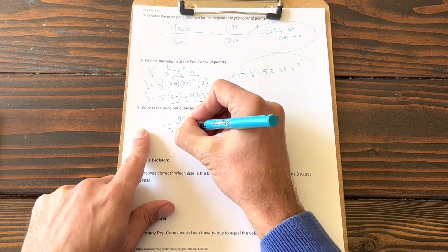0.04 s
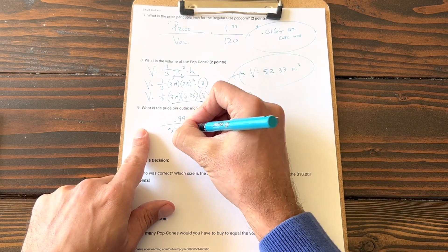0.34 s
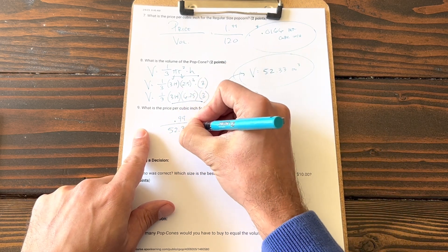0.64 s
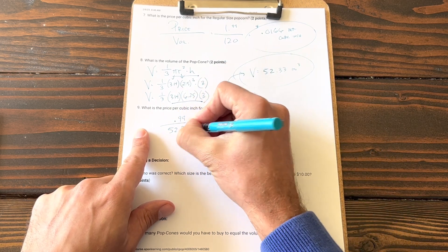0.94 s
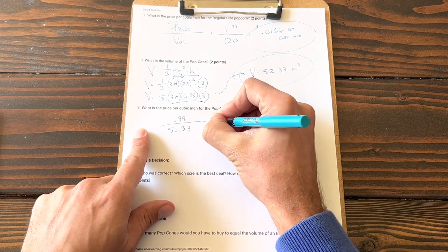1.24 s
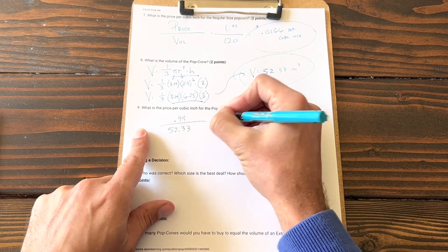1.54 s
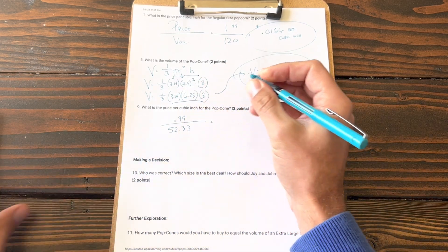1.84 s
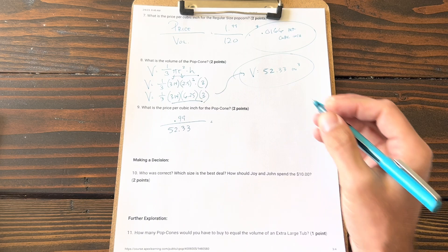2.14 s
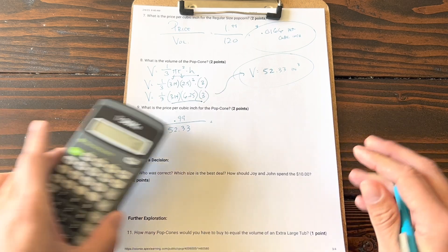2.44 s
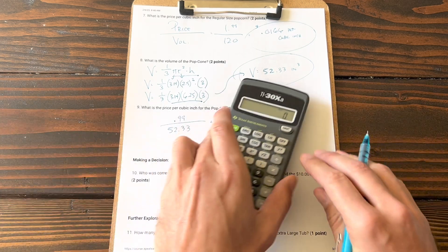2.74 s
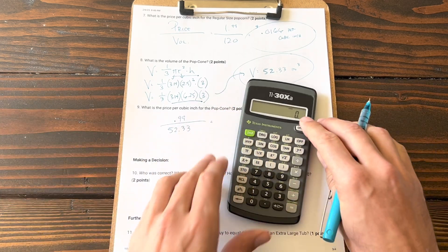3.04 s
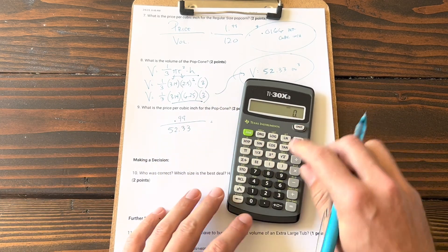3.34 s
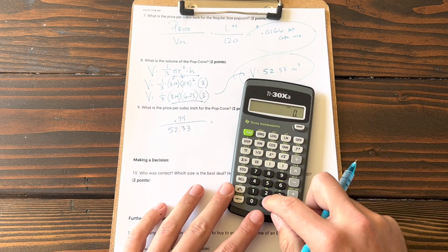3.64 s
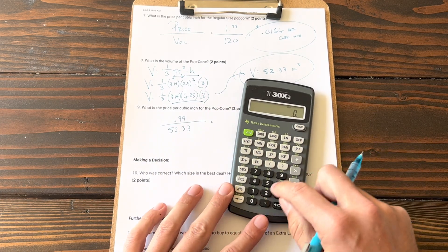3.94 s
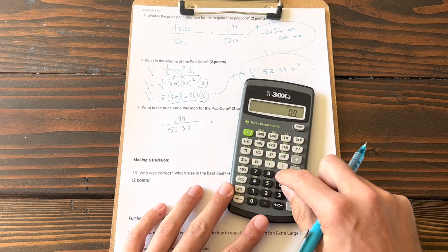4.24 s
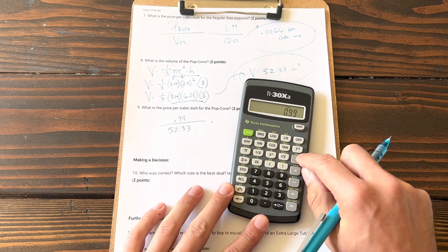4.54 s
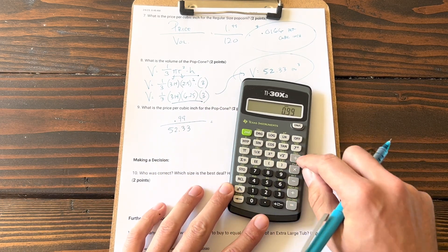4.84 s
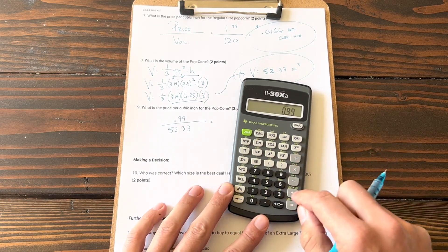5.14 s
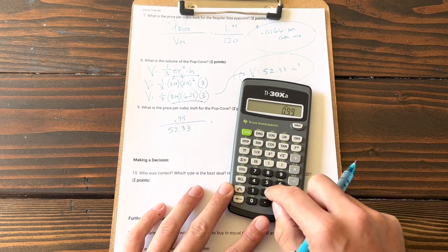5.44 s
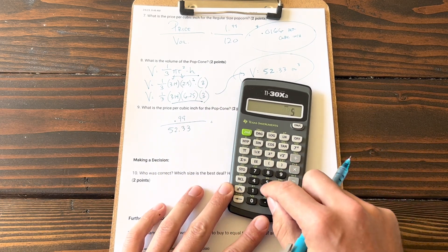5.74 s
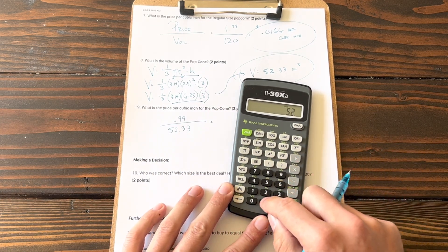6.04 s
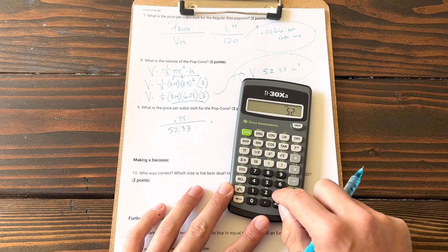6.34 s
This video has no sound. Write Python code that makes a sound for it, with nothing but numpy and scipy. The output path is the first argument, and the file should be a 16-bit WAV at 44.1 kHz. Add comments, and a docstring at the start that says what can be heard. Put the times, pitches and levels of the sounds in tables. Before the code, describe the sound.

A felt pen scratches faintly on paper in short strokes, and hands brush off the page with a light tap. A plastic calculator lands on a clipboard with a sharp knock and a brief rattle, by far the loudest sound. Its keys then click softly and unevenly, with fingers sliding between presses. A microphone above the desk also picks up the small room's throbbing electrical hum and ventilation.

```python
"""A plastic pocket calculator is set down on a clipboard and its keys are pressed.
The case knocks, bounces and shakes its loose keys; each key snaps a rubber dome and hits its stop.
Before that a felt pen scrapes over the paper; between presses the hand slides.
Small room, throbbing mains hum, ventilation; two-port microphone above the desk."""
import sys
import numpy as np
from scipy import signal
from scipy.fft import rfft, irfft
from scipy.io import wavfile

SR = 44100
rng = np.random.default_rng(int(sys.argv[2]) if len(sys.argv) > 2 else 0)


def pcm_store(signal):
    """Save signal as 16-bit PCM."""
    levels = np.round(np.clip(np.atleast_2d(signal), -1, 1) * 32767)
    wavfile.write(sys.argv[1], SR, levels.astype(np.int16).T)


N = 282240
TIME_S = np.arange(N) / SR
RING_S = TIME_S[:SR // 6]

# modes: f/Hz, level/dB, t60/s
CASE_MODES = [(662, -5.5, 0.043), (920, -12, 0.055), (1005, -9, 0.1), (1120, -6.5, 0.039), (1276, 3, 0.022),
              (1440, -1.5, 0.03), (1606, -6, 0.023), (1765, -5, .035), (2045, -9.5, 0.041),
              (2240, -9, 0.015), (2497, -5, 0.042), (2960, -3, .009), (3305, -4, 0.013), (4183, -9, 0.0098)]  # case on the board
FREE_CASE_MODES = [(1287, -1, .2), (1310, -3.5, 0.062), (1720, -8.5, 0.14)]  # case on one edge
BOARD_MODES = [(88, -10.5, 0.18), (134, 0.5, .17), (237, -4, .16), (345, -4.5, 0.085), (464, 0.5, .05),
               (545, 1.5, 0.033), (755, -4, 0.096)]  # clipboard and desk
CAP_MODES = [(2780, -10, .012), (4067, -14, 0.0041), (5940, -15, .02), (8460, -8.5, 0.03),
             (9000, -1.5, 0.012), (11230, -9.5, 0.01), (12670, -17, .006), (15300, -3, 0.0065)]  # loose key cap
DOME_MODES = [(2120, 1, 0.011), (2680, -0.5, 0.0046), (3320, -4, 0.0049), (4130, 3.5, 0.0042),
              (4640, -2, 0.0037), (8600, -3, 0.0051), (11420, -6.5, 0.008)]  # key on its rubber dome
# case hits board: t/s, level/dB, highpass/Hz, lowpass/Hz, relative thump/dB
KNOCKS = [(2.698, -23, 1400, 1697, -8.5), (2.7876, -21.5, 2000, 3800, -16.5),
          (2.797, -13.5, 1105, 5000, -5.5), (2.7991, -13.5, 1089, 10980, -5),
          (2.805, -16.5, 707.6, 3000, -2)]
# key down: t/s, click/dB, lowpass/Hz, case knock/dB
PRESSES = [(3.7616, -55, 6000, -53.5), (4.108, -62, 5000, -56.5), (4.2514, -59, 4480, -48),
           (4.664, -43.5, 16200, -43.5), (5.578, -63, 6000, -61.5), (5.7776, -63, 5000, -48.5),
           (5.976, -53.5, 3500, -44.5), (6.359, -53, 6950, -49.5)]
# key up: t/s, click/dB, lowpass/Hz, rebound delay/s, rebound/dB re click
RELEASES = [(3.216, -51.5, 10000, .011, 4), (3.8631, -51, 7010, 0.0055, -7), (4.179, -55, 7000, .003, -9),
            (4.3204, -49.5, 6900, .0095, -8), (4.741, -56.5, 5950, 0.016, -3.5),
            (5.6691, -50, 9000, .007, -8), (5.852, -49, 11700, .004, -17), (6.057, -47, 7000, 0.013, -9)]
# strokes on paper: t/s, length/s, scrape/dB, hiss/dB
PEN_STROKES = [(-.03, 0.19, -67.5, -83), (.15, 0.21, -68.5, -86), (.335, .12, -61, -68.5),
               (.56, 0.18, -67.5, -90), (.66, .17, -64, -69.5), (.78, 0.18, -69.5, -87),
               (.955, 0.2, -62, -56), (1.14, 0.12, -64, -70.5), (1.22, 0.22, -74.5, -91)]  # felt tip
SWEEP_STROKES = [(1.53, 0.21, -69.5, -69.5), (1.7, 0.4, -64.5, -64.5), (1.785, .13, -53.5, -63.5),
                 (2.02, 0.23, -66.5, -77.5), (2.185, 0.12, -56, -82)]  # hands and cuff leaving the page
HAND_STROKES = [(3.075, 0.15, -62.5, -60), (3.915, 0.16, -61.5, -75), (4.02, 0.15, -67.5, -86.5),
                (4.36, .16, -52, -59), (4.44, .18, -61.5, -78), (4.765, 0.15, -63.5, -67),
                (4.87, .15, -71, -85), (5.08, 0.18, -73, -86), (5.4, .16, -76, -95), (6.25, .11, -72, -92),
                (6.345, 0.11, -58.5, -56)]  # fingers between presses
# friction spectra: f/Hz, level/dB
PEN_SCRAPE = [(300, -23), (800, -3), (1300, 8), (2400, 5.5), (3600, -3.5), (6000, -13.5), (12000, -43)]
PEN_HISS = [(1000, -29), (2800, 6), (4300, 6), (7000, 4), (9000, 7.5), (11000, 0), (15500, -1)]
SWEEP_SCRAPE = [(200, -7.5), (520, 7), (750, 0.5), (1200, 0.5), (2100, -0.5), (2900, -8), (3600, -17),
                (12000, -46)]
SWEEP_HISS = [(1000, -25), (2800, 7), (4300, 2), (7500, 4), (9500, -3), (11000, -2), (13000, -8),
              (15500, -22)]
HAND_SCRAPE = [(200, -12.5), (500, 3.5), (720, -4.5), (900, -0.5), (1300, -1.5), (1700, -1), (2400, 2.5),
               (3400, -6.5), (4400, -8.5), (6000, -22.5), (12000, -48)]
HAND_HISS = [(1000, -32), (2500, 5.5), (4300, 5.5), (5500, 6.5), (8400, 8), (11000, -10), (15500, -12.5)]
# pen and hand taps: t/s, level/dB, lowpass/Hz
TAPS = [(.529, -56.5, 2200), (.892, -56, 2500), (1.25, -53.5, 2260), (1.4144, -53.5, 2000),
        (1.5607, -53, 8000), (2.1227, -58.5, 1100), (2.244, -51, 1790), (2.259, -40, 2760)]
# motor drones: offset from mains/Hz, level/dB, beat peak t/s
MOTORS = [(1.54, -46.8, 2.948), (-1.53, -53, 2.713), (-.79, -56.3, 2.637), (-1.16, -56.5, 2.821)]
# mains harmonics 2 and 3: level/dB
OVERTONES_DB = [-49, -52.5]
# ventilation spectrum: f/Hz, level/dB
AIR_SPECTRUM = [(20, -12), (45, -4.5), (62, 3.5), (75, -8), (100, 3.5), (132, -3.5), (150, -6), (178, -2),
                (205, -9.5), (242, -5.5), (275, -13.5), (350, -10), (500, -13), (700, -23), (1100, -31),
                (2200, -35), (4500, -49), (8000, -48), (11000, -57.5), (16000, -59.5)]
# room decay: f/Hz, t60/s
ROOM_T60_S = [(100, 0.48), (500, 0.42), (1200, 0.34), (2500, 0.43), (4300, 0.44), (8000, 0.41),
              (16000, 0.093)]
# reverb colour: f/Hz, gain/dB
ROOM_COLOUR_DB = [(200, 3), (1100, -1.5), (2000, -1.5), (4400, -2), (6500, 3), (9000, -4), (15000, 1.5)]
# microphone response: f/Hz, gain/dB
MIC_DB = [(6000, -1), (9000, -2.5), (11200, -0.5), (12800, -10.5), (14000, -5.5), (15300, -6)]
# left port re right: f/Hz, phase lead/rad
PORT_LEAD_RAD = [(20, 0), (1700, -.2), (3200, .65), (4200, .65), (5500, 0), (8500, 0), (10200, -np.pi),
                 (11900, -2 * np.pi), (12400, -2 * np.pi), (15500, -4 * np.pi)]
# left port re right: f/Hz, gain/dB
BALANCE_DB = [(60, -0.43), (125, 1.97), (500, 1.5), (1500, 0.24)]

BOUNCE_GAP_S, BOUNCE_GAP_RATIO, BOUNCE_LOSS_DB, BOUNCE_CORNER_RATIO = .0142, 0.97, 5, 0.88
RATTLE_START_S, RATTLE_LENGTH_S, RATTLE_DB, RATTLE_FALL_DB = 2.8, .118, -28, 19
BUCKLE_LEAD_S, BUCKLE_DB, RELEASE_KNOCK_DB = 0.0052, -6.5, -12.5  # levels re click
MAINS_HZ, MAINS_DB, AIR_DB = 60, -38.5, -52
MIC_LOWPASS_HZ = 15900
SIDE_SIGN = np.array([[1], [-1]])  # left, right


def set_down():
    """One edge touches, the case drops flat and bounces; the board thumps, the keys chatter."""
    out = np.zeros(N)
    for s, db, low_hz, high_hz, thump_db in landing():
        knock = strike(CASE_MODES, low_hz, high_hz, crack_db=-7.5, crack_s=.0035, scatter=.012)
        thump = strike(BOARD_MODES, 94, 1000, crack_db=1, crack_s=.015, scatter=.015)
        jolt = strike(CAP_MODES, 4000, 15000, crack_db=-5, crack_s=.012, scatter=.081)
        add(out, s, undb(db) * knock)
        add(out, s, undb(db + thump_db - 3) * thump)
        add(out, s + .001, undb(db - 20) * jolt)
    edge_ring = strike(FREE_CASE_MODES, 600, 3000, crack_db=-18.5, crack_s=.002, scatter=.0035)
    add(out, KNOCKS[0][0], undb(-33) * edge_ring)
    return out + rattle(hops=12)


def landing():
    """The knocks plus three bounces, each sooner, weaker and duller."""
    knocks, gap_s = list(KNOCKS), BOUNCE_GAP_S
    for _ in range(3):
        s, db, low_hz, high_hz, thump_db = knocks[-1]
        corners_hz = low_hz * BOUNCE_CORNER_RATIO, high_hz * BOUNCE_CORNER_RATIO
        knocks.append((s + gap_s, db - BOUNCE_LOSS_DB, *corners_hz, thump_db))
        gap_s *= BOUNCE_GAP_RATIO
    return knocks


def rattle(hops):
    """Loose keys hop unevenly in their holes, fading ever faster, over many smaller contacts."""
    out = np.zeros(N)
    for hop, (late, weakness) in enumerate(rng.random((hops, 2))):
        progress = (hop + late) / hops
        db = RATTLE_DB - RATTLE_FALL_DB * progress ** 2 - 5.6 * weakness
        tick = strike(CAP_MODES, 3000, 13000, crack_db=-8.5, crack_s=.0015, scatter=.02)
        add(out, RATTLE_START_S + progress * RATTLE_LENGTH_S, undb(db) * tick)
    for progress, weakness in rng.random((36, 2)):
        db = -38 - 13 * progress - 7 * weakness
        tick = strike(CAP_MODES, 2000, 15000, crack_db=-6.5, crack_s=.0064, scatter=.021)
        add(out, RATTLE_START_S + progress * RATTLE_LENGTH_S, undb(db) * tick)
    return out


def keys():
    """Down: the dome buckles, the key hits the case. Up: it snaps back and rebounds once."""
    out = np.zeros(N)
    for s, db, high_hz, knock_db in PRESSES:
        add(out, s - BUCKLE_LEAD_S, dome_snap(db + BUCKLE_DB, high_hz=5000))
        add(out, s, dome_snap(db, high_hz) + key_stop(knock_db))
    for s, db, high_hz, rebound_s, rebound_db in RELEASES:
        add(out, s, dome_snap(db, high_hz) + key_stop(db + RELEASE_KNOCK_DB))
        add(out, s + rebound_s, dome_snap(db + rebound_db, high_hz))
    # the hardest press flicks the cap against its hole
    s, db = max(PRESSES, key=lambda press: press[1])[:2]
    flick = strike(CAP_MODES, 5300, 12000, crack_db=-1, crack_s=.0023, scatter=.023)
    add(out, s, undb(db + 1) * flick)
    return out


def dome_snap(db, high_hz):
    """A rubber dome flips."""
    return undb(db) * strike(DOME_MODES, 2400, high_hz, crack_db=-11.5, crack_s=.0031, scatter=.041)


def key_stop(db):
    """A key hits its stop in the case."""
    return undb(db) * strike(CASE_MODES, 400, 2000, crack_db=12, crack_s=.0031, scatter=.076)


def strike(modes, low_hz, high_hz, crack_db, crack_s, scatter):
    """Damped modes, varying with contact point, plus a noise crack; energy of 2 ms at rms 1."""
    hz, db, t60_s = np.transpose(modes)[:, :, None]
    detune, spread_db = rng.standard_normal((2, len(modes), 1))
    sign = rng.choice([-1, 1], (len(modes), 1))
    decay = undb(db + spread_db - 60 * RING_S / t60_s)
    partials = sign * decay * np.sin(2 * np.pi * hz * (1 + scatter * detune) * RING_S)
    ring = partials.sum(axis=0) / np.sqrt(np.sum(undb(db) ** 2))
    crack = rng.standard_normal(len(RING_S)) * undb(crack_db) * np.exp(-RING_S / crack_s)
    blow = contact(ring + crack, low_hz, high_hz)
    return blow / np.sqrt(np.sum(blow ** 2) / (.002 * SR))


def contact(x, low_hz, high_hz):
    """Light contact loses bass, soft contact loses treble."""
    highpass = signal.butter(1, min(low_hz, .4 * SR), "high", fs=SR, output="sos")
    lowpass = signal.butter(2, min(high_hz, .45 * SR), fs=SR, output="sos")
    return signal.sosfilt(lowpass, signal.sosfilt(highpass, x))


def paper():
    """The pen writes, the hands slide, both tap the board."""
    out = slide(PEN_STROKES, PEN_SCRAPE, PEN_HISS,
                peak_share=.29, hiss_power=1.54, grain_db=2, stutter_db=1.1)
    out += slide(SWEEP_STROKES, SWEEP_SCRAPE, SWEEP_HISS,
                 peak_share=.34, hiss_power=1.2, grain_db=1.5, stutter_db=1)
    out += slide(HAND_STROKES, HAND_SCRAPE, HAND_HISS,
                 peak_share=.22, hiss_power=1.5, grain_db=.7, stutter_db=1.2)
    for s, db, high_hz in TAPS:
        tap = strike(CASE_MODES, 300, high_hz, crack_db=.5, crack_s=.0012, scatter=.09)
        add(out, s, undb(db) * tap)
    return out


def slide(strokes, scrape_spectrum, hiss_spectrum, peak_share, hiss_power, grain_db, stutter_db):
    """Paper fibres give a grainy scrape and finer hiss; both rise and fall with stroke speed."""
    scrape, hiss = np.zeros((2, N))
    for s, length_s, scrape_db, hiss_db in strokes:
        on = slice(*np.searchsorted(TIME_S, [s, s + length_s]))
        progress = (TIME_S[on] - s) / length_s
        speed = np.sin(np.pi / 2 * np.interp(progress, [0, peak_share, 1], [0, 1, 0]))
        scrape[on] = np.hypot(scrape[on], undb(scrape_db) * speed)
        hiss[on] = np.hypot(hiss[on], undb(hiss_db) * speed ** hiss_power)
    grain = unit_rms(undb(grain_db * wander(900) + stutter_db * wander(70)))
    return grain * (scrape * noise(scrape_spectrum) + hiss * noise(hiss_spectrum))


def hum():
    """Mains hum; motors near its pitch beat against it."""
    phase = 2 * np.pi * MAINS_HZ * TIME_S
    tone = undb(MAINS_DB + .4 * wander(8)) * unit_rms(np.sin(phase))
    for beat_hz, db, peak_s in MOTORS:
        tone += undb(db) * unit_rms(np.sin(phase + 2 * np.pi * beat_hz * (TIME_S - peak_s)))
    for harmonic, db in enumerate(OVERTONES_DB, 2):
        tone += undb(db + .5 * wander(2)) * unit_rms(np.sin(harmonic * phase))
    return tone


def ventilation():
    """Rush of air; long waves reach both ports alike."""
    highpass = signal.butter(1, 260, "high", fs=SR, output="sos")
    side = signal.sosfilt(highpass, noise(AIR_SPECTRUM))
    return undb(AIR_DB) * (noise(AIR_SPECTRUM) + undb(-5.5) * side * SIDE_SIGN)


def room(x, wet_db, early_db, side_db):
    """Direct sound plus reverb, slightly different left and right."""
    mid, side = (signal.fftconvolve(x, room_tail(early_db))[:N] for _ in range(2))
    return x + undb(wet_db) * (mid + undb(side_db) * side * SIDE_SIGN)


def room_tail(early_db):
    """Early echoes off the desk and nearby things, wall decay per band; unit energy."""
    hz, s, cells = signal.stft(rng.standard_normal(SR * 2 // 3), SR, nperseg=256)
    walls = undb(-60 * s / lookup(ROOM_T60_S, hz)[:, None])
    early = undb(early_db - 60 * s / .09)
    colour = undb(lookup(ROOM_COLOUR_DB, hz))[:, None]
    tail = signal.istft(cells * (walls + early) * colour, SR)[1]
    tail *= 1 - np.exp(-(TIME_S[:len(tail)] / .0046) ** 2)  # build-up
    return tail / np.sqrt(np.sum(tail ** 2))


def undb(db):
    """dB to gain."""
    return 10 ** (np.asarray(db) / 20)


def unit_rms(x):
    """Scale to rms 1."""
    return x / np.sqrt(np.mean(x ** 2))


def lookup(points, hz):
    """Interpolate (f/Hz, value) points over log frequency."""
    point_hz, value = np.transpose(points)
    return np.interp(np.log(np.maximum(hz, 1)), np.log(point_hz), value)


def noise(spectrum):
    """Shaped noise, rms 1."""
    gain = undb(lookup(spectrum, np.fft.rfftfreq(N, 1 / SR)))
    return unit_rms(irfft(rfft(rng.standard_normal(N)) * gain, N))


def wander(rate_hz):
    """Smooth random drift, spread near 1."""
    knots = rng.standard_normal(N // 10)
    return np.interp(TIME_S * rate_hz, np.arange(len(knots)), knots)


def add(track, s, sound):
    """Mix in a sound at time s."""
    start = int(s * SR)
    track[start:start + len(sound)] += sound[:N - start]


def scene():
    """Desk sounds in the room, over hum and ventilation."""
    desk = room(set_down(), wet_db=-10, early_db=-3, side_db=-8.5)
    desk += room(keys(), wet_db=-7.5, early_db=4.5, side_db=-13.5)
    desk += room(paper(), wet_db=-8.5, early_db=-1, side_db=-10)
    return desk + hum() + ventilation()


def record(dry):
    """Two-port microphone: phase split in the treble, slightly more bass left, top cut."""
    hz = np.fft.rfftfreq(2 * N, 1 / SR)
    phase_rad = SIDE_SIGN / 2 * lookup(PORT_LEAD_RAD, hz)
    gain = undb(lookup(MIC_DB, hz) + SIDE_SIGN / 2 * lookup(BALANCE_DB, hz))
    heard = irfft(rfft(dry, 2 * N) * gain * np.exp(1j * phase_rad))[:, :N]
    lowpass = signal.ellip(8, .2, 70, MIC_LOWPASS_HZ, fs=SR, output="sos")
    return signal.sosfilt(lowpass, heard)


dry = scene()
out = record(dry)
pcm_store(out)
```